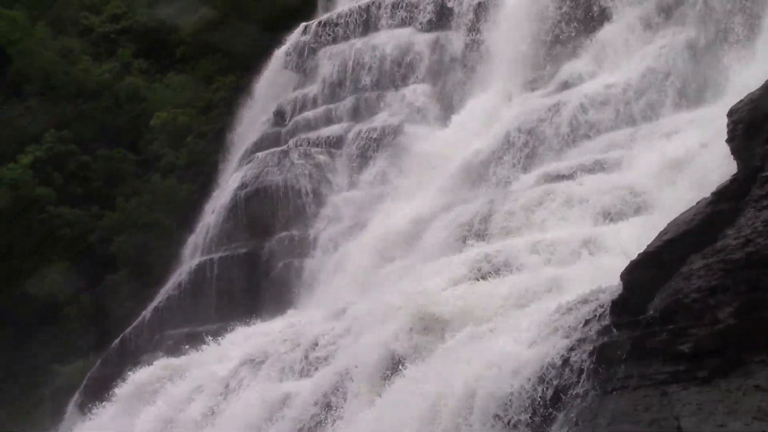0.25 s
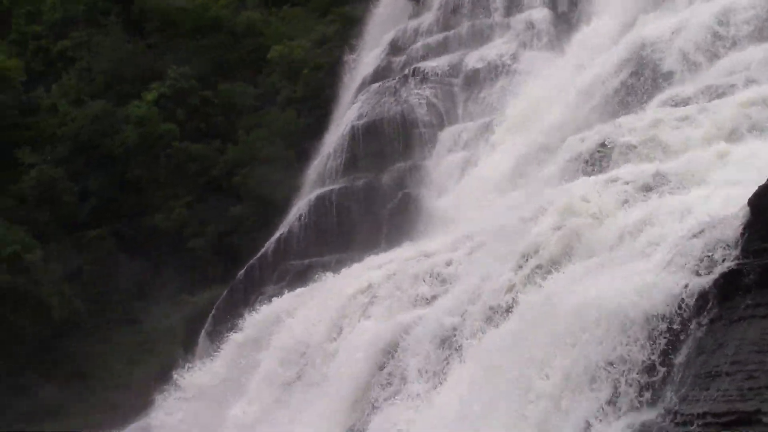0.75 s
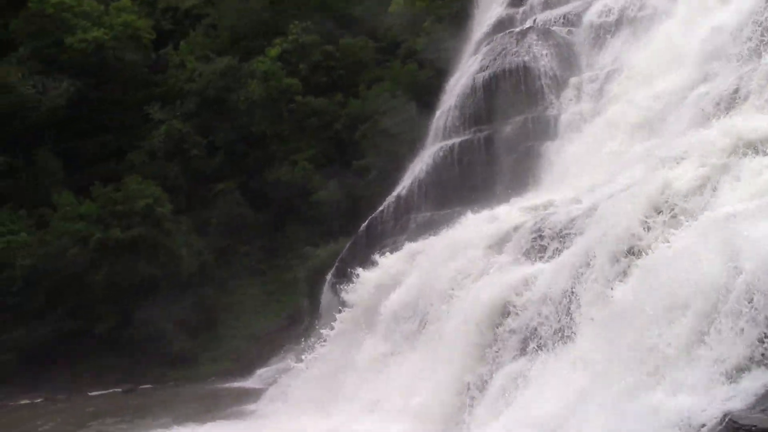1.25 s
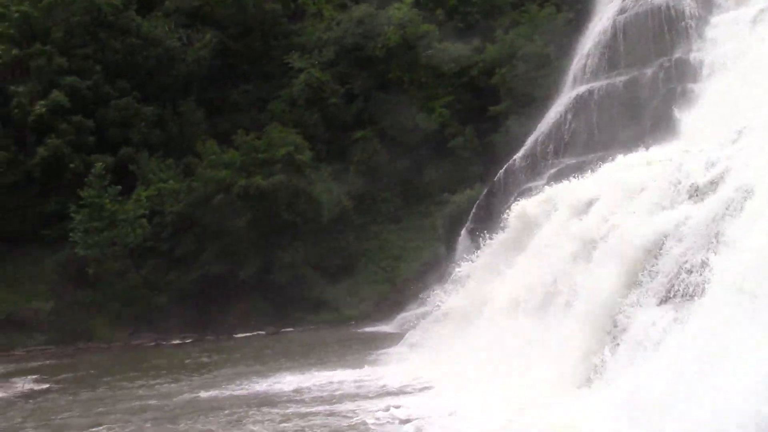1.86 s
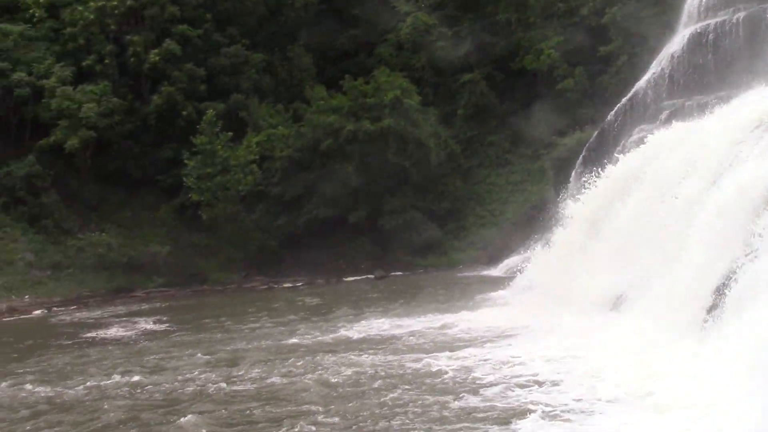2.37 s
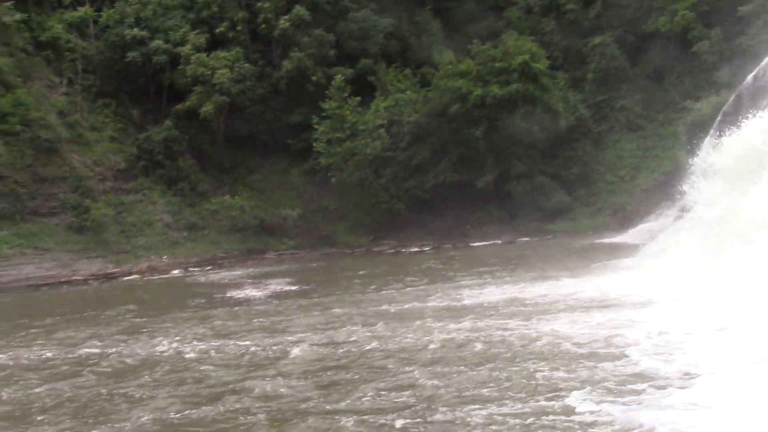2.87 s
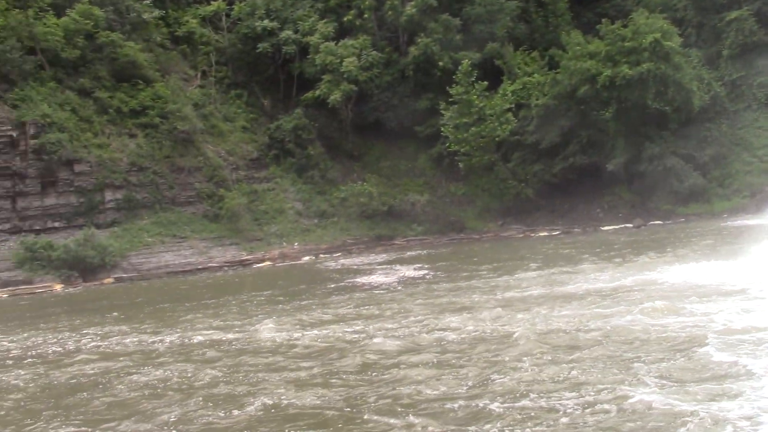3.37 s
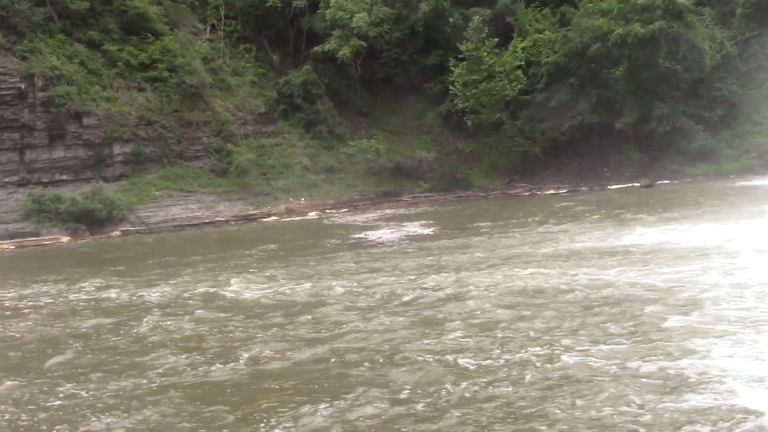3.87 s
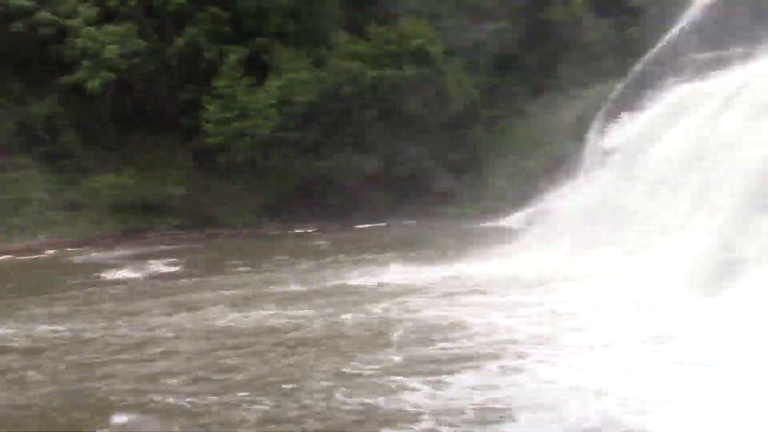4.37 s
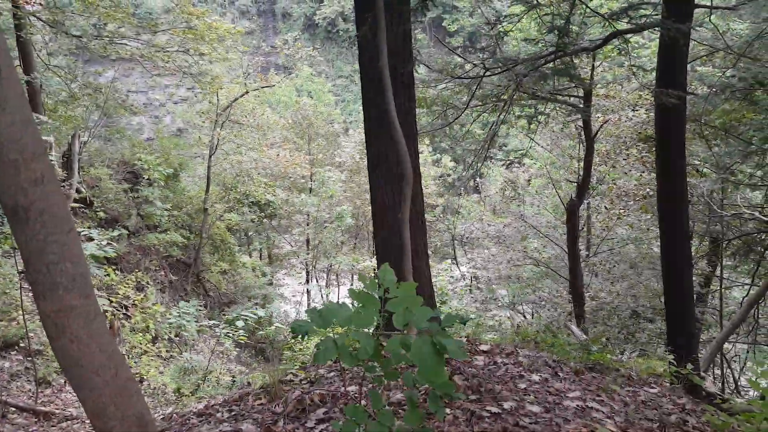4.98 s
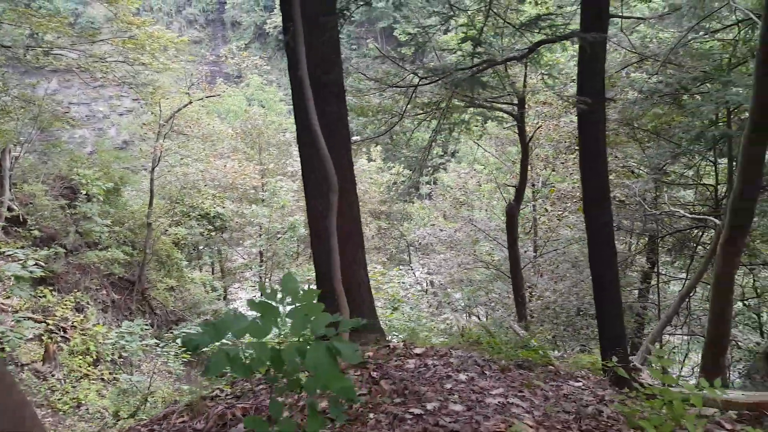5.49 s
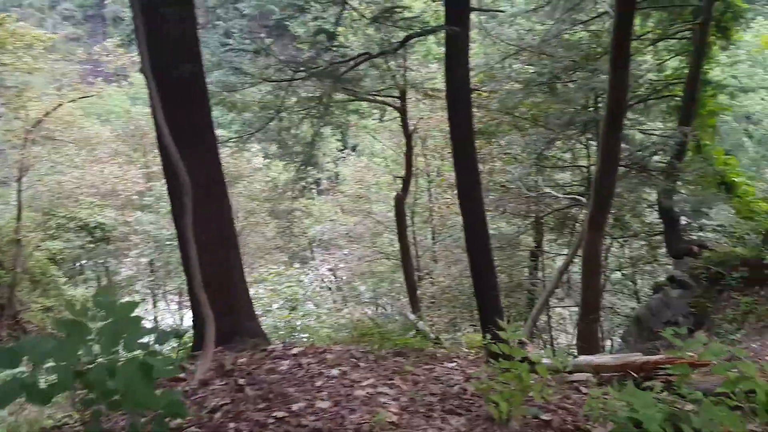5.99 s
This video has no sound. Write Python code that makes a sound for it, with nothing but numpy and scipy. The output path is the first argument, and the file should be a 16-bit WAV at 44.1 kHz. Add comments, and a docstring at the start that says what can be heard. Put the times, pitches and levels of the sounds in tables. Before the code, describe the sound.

Close roaring falls with low wind buffets give way to brighter hissing white water, fade out, and a deep distant river fades in.

```python
"""A large waterfall crashes over rock ledges into a gorge, close by; gusts from its foot brush the microphone.
The microphone turns from the booming falls to the hissing rapids below them, and the sound fades out.
Then the river fades in from a wooded bank above: duller, deeper and much wider.
All the water is churning noise mixed with ringing bubbles, then shaped in colour, width and bearing;
low thuds are short swells of noise, and the gusts are swells of low noise, separate left and right."""
import sys
import numpy as np
from scipy import signal
from scipy.fft import rfft, irfft, next_fast_len
from scipy.io import wavfile

SR = 44100
rng = np.random.default_rng(int(sys.argv[2]) if len(sys.argv) > 2 else 0)


def persist_wave(psi):
    """Save psi, clipped to +-1, as 16-bit WAV."""
    counts = np.round(np.clip(psi, -1, 1) * 32767).astype(np.int16)
    wavfile.write(sys.argv[1], SR, np.atleast_2d(counts).T)


N = 275184
TIME = np.arange(N) / SR
SIZE = next_fast_len(N)
HZ = np.maximum(np.arange(SIZE // 2 + 1) * SR / SIZE, 1)

# turn of the microphone: (time [s], share of the power that comes from the rapids [0-1])
TURN = [(1.3, 0.0), (2.0, 0.03), (2.6, 0.13), (2.7, 0.85), (2.92, 1.0)]
# low thumps, equal left and right: (time [s], level [dB], centre [Hz], spread of the swell [s])
THUDS = [(2.438, -26, 219, 0.0094), (2.52, -26, 200, .014), (2.6, -25, 260, 0.015),
         (2.745, -28.5, 310, 0.012), (2.856, -34.5, 240, 0.037), (3.78, -45, 165, 0.03)]
# colour of each body of water: (frequency [Hz], relative level per Hz [dB])
FALLS_COLOUR = [(30, -40), (55, -27.5), (100, -10.5), (190, -0.3), (330, -0.6), (480, -5), (600, -2.5),
                (780, -8), (1100, -5), (2050, -10.5), (3000, -9.5), (5600, -15), (7500, -14), (11000, -19),
                (15700, -29)]
RAPIDS_COLOUR = [(30, -42.5), (80, -27), (150, -7.5), (270, -0.3), (420, 0.3), (800, -2.5), (1550, -0.2),
                 (2100, -3.5), (2900, -1), (4000, -2.7), (5600, -5.5), (7800, -5), (10500, -9),
                 (15700, -22)]
RIVER_COLOUR = [(30, -16), (85, -1), (230, 0.7), (340, -3.5), (490, -10.5), (680, -6), (1200, -11.5),
                (2600, -13.5), (3600, -17.5), (4800, -15), (7000, -28), (8400, -28.5), (9700, -49),
                (15700, -53)]
# stereo width of each: (frequency [Hz], side minus mid [dB])
FALLS_WIDTH = [(150, -40.5), (450, -39.5), (720, -19.5), (1100, -41), (2000, -23.5), (3000, -27),
               (5300, -13.5), (8000, -20), (13000, -18), (15500, -22)]
RAPIDS_WIDTH = [(150, -70), (2800, -69), (4500, -23), (6000, -12.5), (9000, -10), (13000, -4)]
RIVER_WIDTH = [(250, -18.5), (500, -6), (700, -8), (1400, -1), (3000, -1.5), (3700, 1.2), (4500, -.3),
               (13000, 0)]
# bearing of each: (frequency [Hz], left minus right [dB], phase lead of the left [rad])
FALLS_BEARING = [(300, 0, 0), (700, .3, 0), (2800, -.1, 0), (5500, -.8, -.1), (8000, -.3, -.03)]
RAPIDS_BEARING = [(3600, 0, 0), (5560, 2.0, -0.27), (7700, .9, -0.35), (10500, 1.7, -0.6),
                  (13200, -.4, -0.85)]
RIVER_BEARING = [(250, 0.5, -0.06), (450, 1.5, -.25), (850, 1.8, 0.031), (1500, 5.3, 0), (2600, 4, -0.35),
                 (3500, -1, -0.35), (4500, -12, 0), (5600, -16, 0), (7200, -6.5, 0), (8700, -10, 0),
                 (11000, -4.3, 0), (15000, -2, 0)]
# borders of the four registers, plunge, wash, splash and spray: (frequency [Hz])
REGISTER_EDGES_HZ = [20, 450, 1500, 10000, 22000]
# bass of the water plunging into the pool: (time [s], level [dB])
PLUNGE = [(0, -28.7), (1.2, -26.4), (2.0, -25.8), (2.12, -29.3), (2.6, -29.0), (2.95, -37.4), (3.22, -42.0),
          (3.42, -36.3), (3.9, -35.8), (4.05, -39)]
# splashing, which dips as the microphone swings between falls and rapids: (time [s], level [dB])
SPLASH = [(0, -24.0), (1.4, -24.7), (1.65, -25.6), (2.0, -25.5), (2.22, -28.0), (2.65, -28.4), (3.0, -26.4),
          (3.27, -26.4), (3.45, -25.5)]
# gusts of wind on the microphone: (time [s], peak level [dB], spread of the swell [s])
GUSTS = [(0.38, -32, 0.025), (0.6, -37, 0.04), (1.05, -32, 0.03), (1.66, -33, 0.09), (1.95, -31, 0.1),
         (2.31, -34.5, 0.09), (2.57, -29, 0.04), (5.85, -34, 0.025)]
# colour of the wind: (frequency [Hz], relative level per Hz [dB])
WIND_COLOUR = [(25, -45), (60, -21), (110, -5), (190, 4), (330, -0.5), (700, -13), (1100, -38),
               (3000, -56.5)]

# the wash lies between plunge and splash, and is weaker towards the rapids
WASH_DB, WASH_FOLLOWS_PLUNGE, WASH_TURN_DB = -1.45, 0.25, -3.9
# the spray swings further than the splashing
SPRAY_DB, SPRAY_AT_SPLASH_DB, SPRAY_SWING, SPRAY_TURN_DB = -36.2, -25, 1.45, -3.0
# the river swells steadily from the start of its fade-in, and its rumble grows on top of that
RIVER_START_DB, RIVER_RISE_DB_PER_S = -27.2, 1.2
RUMBLE_START_DB, RUMBLE_RISE_DB_PER_S, RUMBLE_TOP_HZ = -3.8, 2.8, 140
DRAUGHT_DB, BUFFET_FLUTTER_DB, BUFFET_FLUTTER_HZ = -58, 1.4, 19
FADE_OUT_S, FADE_OUT_LENGTH_S, FADE_OUT_POWER = 3.726, 0.97, 2.91
FADE_IN_S, FADE_IN_LENGTH_S, FADE_IN_POWER = 4.72, 0.94, 0.92
CUTOFF_HZ, STOP_S = 15800, 0.002


def gorge():
    """Falls and rapids, levelled register by register, trade power as the microphone turns."""
    falls_bubbles = bubbles(per_s=7000, spread_db=3.0, cycles=4.0)
    sheet = white_water(from_db(-11) * falls_bubbles, churn_db=1.0, churn_rate=17, heave_db=0.24)
    rapids_bubbles = bubbles(per_s=6000, spread_db=2.5, cycles=7.2)
    foam = white_water(from_db(-9) * rapids_bubbles, churn_db=0.45, churn_rate=14, heave_db=0.16)
    falls = placed(sheet, FALLS_COLOUR, FALLS_WIDTH, FALLS_BEARING)
    rapids = placed(foam, RAPIDS_COLOUR, RAPIDS_WIDTH, RAPIDS_BEARING)
    turn = in_time(TURN)
    out = thuds()
    for level_db, low, high in zip(register_levels(turn), REGISTER_EDGES_HZ, REGISTER_EDGES_HZ[1:]):
        from_falls, from_rapids = register(falls, low, high), register(rapids, low, high)
        blend = np.sqrt(1 - turn) * from_falls + np.sqrt(turn) * from_rapids
        out = out + from_db(level_db) * blend
    return out


def thuds():
    """Low thumps arrive as short swells of low noise, equal left and right."""
    out = np.zeros(N)
    for s, level_db, hz, spread in THUDS:
        body = rms_one(filtered(rng.standard_normal(N), band(hz / 1.75, hz * 1.56)))
        out += from_db(level_db) * body * swell(s, spread)
    return out


def register_levels(turn):
    """Levels in dB: the wash follows both plunge and splash, the spray follows the splash."""
    plunge, splash = in_time(PLUNGE), in_time(SPLASH)
    wash = splash + WASH_FOLLOWS_PLUNGE * (plunge - splash) + WASH_DB + WASH_TURN_DB * turn
    spray = SPRAY_DB + SPRAY_SWING * (splash - SPRAY_AT_SPLASH_DB) + SPRAY_TURN_DB * turn
    return plunge, wash, splash, spray


def register(x, low, high):
    """One register of a stereo sound, scaled by the rms of its mono sum between the edges."""
    inside = filtered(x.mean(axis=0), (HZ >= low) & (HZ < high))
    return filtered(x, band(low, high)) / inside.std()


def river():
    """A smooth, deep rush among the trees that arrives from all sides, its hiss from the right."""
    river_bubbles = bubbles(per_s=8000, spread_db=2.5, cycles=4.4)
    water = white_water(from_db(-16) * river_bubbles, churn_db=0.9, churn_rate=15, heave_db=0.24)
    rush = rms_one(placed(water, RIVER_COLOUR, RIVER_WIDTH, RIVER_BEARING))
    rumble = filtered(rush, band(1, RUMBLE_TOP_HZ))
    since = TIME - FADE_IN_S
    level_db = RIVER_START_DB + RIVER_RISE_DB_PER_S * since
    rumble_db = RUMBLE_START_DB + RUMBLE_RISE_DB_PER_S * since
    return from_db(level_db) * (rush - rumble + from_db(rumble_db) * rumble)


def white_water(burst, churn_db, churn_rate, heave_db):
    """Countless bursts merge into noise, the nearest stand out; each band churns, and all heave together."""
    mid, side = rng.standard_normal((2, N))
    side = side * np.sqrt(1 + np.mean(burst ** 2))   # as strong as the mid with its bursts
    spectra = rfft(np.array([mid + burst, side]), SIZE)
    edges = 22 * 2. ** np.array([0, 2, 3, 4, 5, 6, 7, 8, 9, 10])   # octaves above a wide bottom band
    heave, out = heave_db * drift(11), 0
    for low, high in zip(edges, edges[1:]):
        lumpy_db = churn_db * (250 / high) ** 0.49   # big slugs of water are fewer, so the bass is lumpier
        part = irfft(spectra * band(low, high), SIZE)[:, :N]
        out = out + part * from_db(heave + lumpy_db * drift(churn_rate))
    return out


def bubbles(per_s, spread_db, cycles):
    """Bubbles and drops burst at random; each rings at its own pitch, dying by 60 dB in a few cycles."""
    pitches = np.geomspace(300, 12000, 20)
    loudness_db = spread_db * np.minimum(rng.exponential(1, N), 5)
    strengths = from_db(loudness_db) * rng.choice([-1, 1], N)
    births = strengths * (rng.random(N) < per_s / SR)
    dealt = rng.choice(len(pitches), N, p=pitches / pitches.sum())   # small, high bubbles are the most common
    out = np.zeros(N)
    for k, hz in enumerate(pitches):
        w = 2 * np.pi * hz / SR
        r = np.exp(-np.log(1000) * hz / (cycles * SR))
        kicks = births * (dealt == k) + 1e-18   # the tiny offset keeps the filter out of denormals
        out += signal.lfilter([1, -1], [1, -2 * r * np.cos(w), r * r], kicks) * np.sqrt(w)
    return rms_one(out)


def placed(water, colour, width, bearing):
    """Colour mid and side, turn them into left and right, and favour one side in level and phase."""
    mid, side = rfft(water, SIZE) * gain_by_hz(colour)
    side = side * gain_by_hz(width)
    hz, *columns = np.transpose(bearing)
    left_db, lead = (np.interp(np.log(HZ), np.log(hz), c) for c in columns)
    toward = from_db(left_db / 2) * np.exp(.5j * lead)
    keep_power = np.sqrt(np.cosh(2 * np.log(np.abs(toward))))
    ears = np.array([toward, 1 / toward]) / keep_power
    return irfft(np.array([mid + side, mid - side]) * ears, SIZE)[:, :N]


def wind():
    """Gusts buffet each microphone port on its own; a light draught blows while it faces the falls."""
    noise = filtered(rng.standard_normal((2, N)), gain_by_hz(WIND_COLOUR))
    buffet = rms_one(noise) / np.sqrt(2)   # each channel has rms 1
    draught = from_db(DRAUGHT_DB) * (1 - in_time(TURN))
    gusts = sum(from_db(peak_db) * swell(s, spread) for s, peak_db, spread in GUSTS)
    flutter = from_db(BUFFET_FLUTTER_DB * drift(BUFFET_FLUTTER_HZ))
    return buffet * (draught + gusts) * flutter


def swell(s, spread):
    """A bell-shaped rise and fall around a moment; the spread is its standard deviation in seconds."""
    return np.exp(-.5 * ((TIME - s) / spread) ** 2)


def drift(rate):
    """Slow chance with spread 1, changing about `rate` times a second."""
    r = np.exp(-80 * np.pi * rate / SR)   # computed at every 40th sample
    chance = rng.standard_normal(N // 40 + 2002)
    slow = signal.lfilter([1], [1, -2 * r, r * r], chance)[2000:]   # skip the settling
    return np.interp(np.arange(N) / 40, np.arange(len(slow)), rms_one(slow))


def band(low, high):
    """Band-pass gain; neighbouring bands add up to nearly one."""
    return 1 / ((1 + (low / HZ) ** 8) * (1 + (HZ / high) ** 8))


def filtered(x, gain):
    """Apply a gain for every frequency."""
    return irfft(rfft(x, SIZE) * gain, SIZE)[..., :N]


def gain_by_hz(points):
    """Gain at every frequency from (frequency [Hz], level [dB]) points."""
    hz, db = np.transpose(points)
    return from_db(np.interp(np.log(HZ), np.log(hz), db))


def in_time(points):
    """A curve over the whole sound from (time [s], value) points."""
    s, value = np.transpose(points)
    return np.interp(TIME, s, value)


def rms_one(x):
    """Scale a signal so that the mean of its channels has rms 1."""
    return x / np.sqrt(np.mean(np.atleast_2d(x).mean(axis=0) ** 2) + 1e-20)


def from_db(db):
    """Decibels to gain."""
    return 10 ** (np.asarray(db) / 20)


def scene():
    """The gorge fades to silence, then the river fades in; the wind follows both fades."""
    fade_out = np.clip(1 - (TIME - FADE_OUT_S) / FADE_OUT_LENGTH_S, 0, 1) ** FADE_OUT_POWER
    fade_in = np.clip((TIME - FADE_IN_S) / FADE_IN_LENGTH_S, 0, 1) ** FADE_IN_POWER
    return fade_out * gorge() + fade_in * river() + (fade_out + fade_in) * wind()


def record(dry):
    """The sound stops without a click, and the top is cut steeply."""
    stop = np.clip((TIME[-1] - TIME) / STOP_S, 0, 1)
    low_pass = signal.firwin(601, CUTOFF_HZ, fs=SR, window="blackman")
    return signal.fftconvolve(dry * stop, low_pass[None], mode="same", axes=1)


dry = scene()
out = record(dry)
persist_wave(out)
```